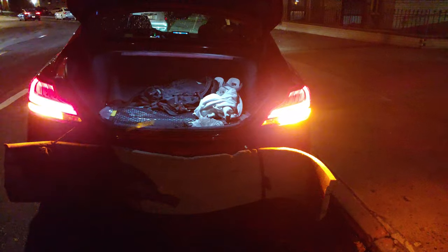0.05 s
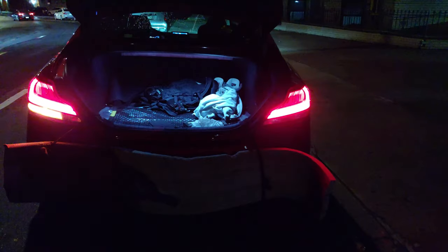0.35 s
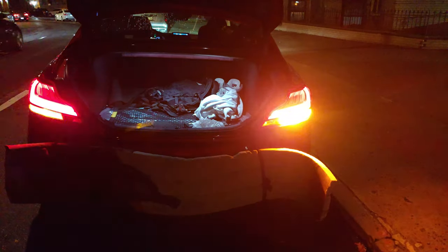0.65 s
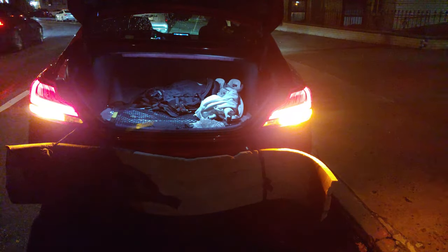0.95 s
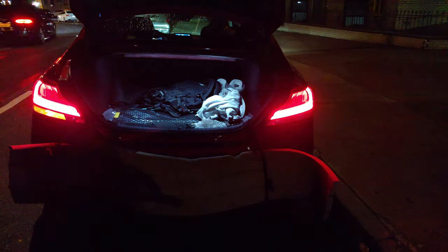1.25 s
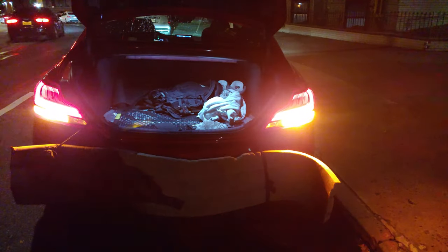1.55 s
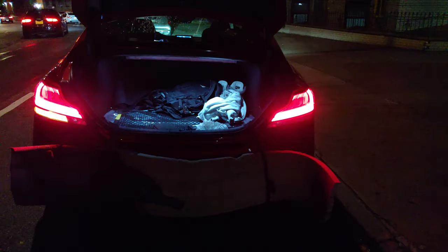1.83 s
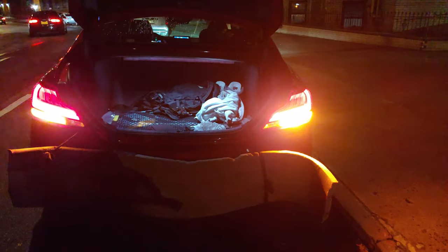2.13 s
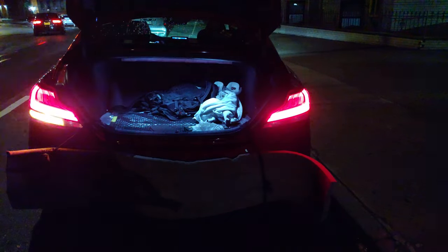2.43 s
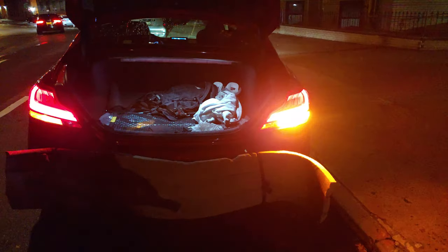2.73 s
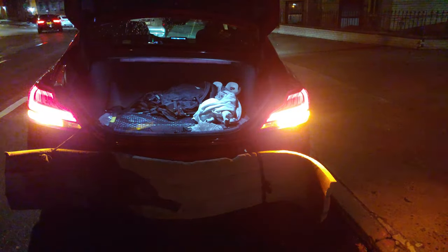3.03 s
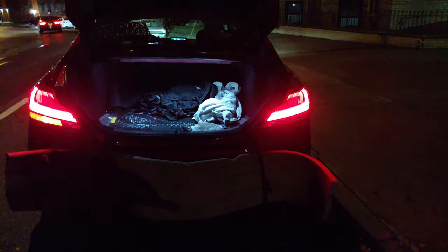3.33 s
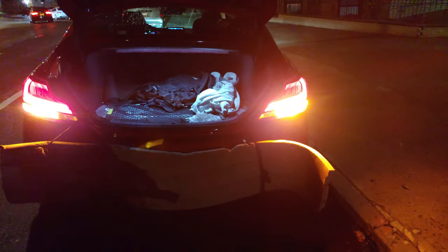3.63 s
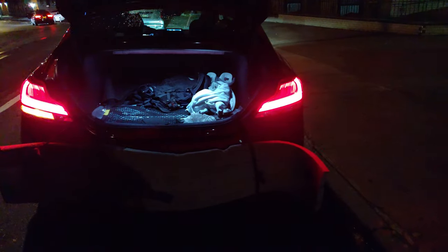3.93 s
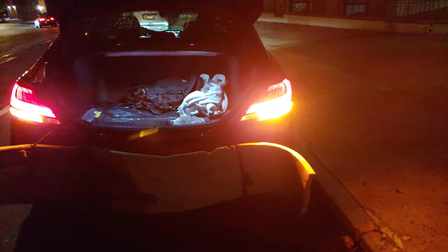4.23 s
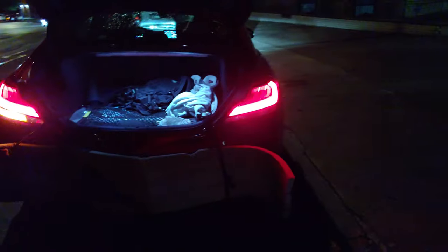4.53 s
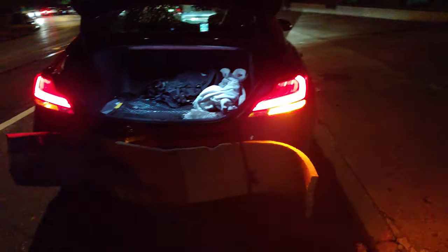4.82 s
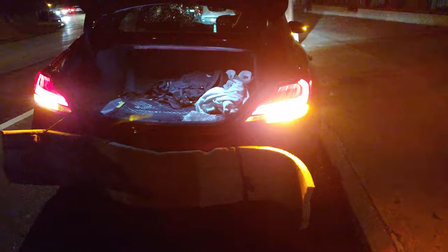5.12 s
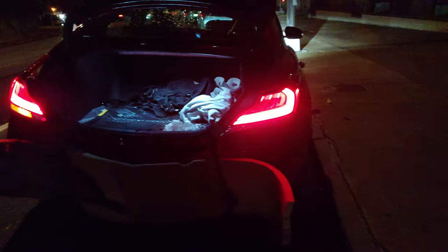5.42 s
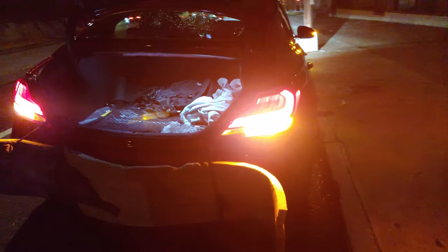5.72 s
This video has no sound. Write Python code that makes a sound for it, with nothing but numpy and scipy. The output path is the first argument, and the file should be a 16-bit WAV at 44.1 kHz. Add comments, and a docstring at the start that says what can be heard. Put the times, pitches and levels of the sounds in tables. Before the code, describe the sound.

A parked car idles a few steps away on a street at night. Its low exhaust hum swells over the first two seconds and then holds to the end, over a soft roar of distant tyres. From about 0.5 seconds another car revs up, shifts gear at around 1.3 seconds and recedes, growing faint by 4 seconds. At about 2.9 and 3.2 seconds wheels tip a loose road cover, giving two sharp clacks with a short echo; loose metal rattles briefly after the first. Crickets trill high throughout, growing a little louder in the second half. Close by there are tiny ticks at about 1.3, 3.4 and 5.3 seconds, a small scuff at 3.4 and very faint thin squeaks around 4 seconds. A faint fan tone and a barely audible electrical whine lie underneath.

```python
"""Night kerb, idling car.

A parked car idles a few steps away: exhaust hum, gas puffs. Another revs, shifts and pulls away over far
tyre noise. Two axles tip a loose road cover, which clacks; loose metal rattles after the first clack.
Crickets trill by wing strokes. Faint ticks, scuffs and squeaks close by; a faint fan and electrical whine."""
import sys
import numpy as np
from scipy import signal
from scipy.fft import rfft, irfft
from scipy.io import wavfile

SR = 44100
rng = np.random.default_rng(int(sys.argv[2]) if len(sys.argv) > 2 else 0)


def persist_wave(psi):
    """Save psi, clipped to +-1, as 16-bit WAV."""
    counts = np.round(np.clip(psi, -1, 1) * 32767).astype(np.int16)
    wavfile.write(sys.argv[1], SR, np.atleast_2d(counts).T)


N = 254456
T = np.arange(N) / SR
BIN_HZ = np.fft.rfftfreq(N, 1 / SR)

# street balance: f/Hz, left minus right/dB
STREET_BALANCE = [(100, 2), (400, 0), (1100, -2), (1600, -3), (2400, 1), (3400, -5), (4400, -1.5),
                  (5800, 4.5), (6600, 9), (7700, -4.5), (9600, 6.5), (12000, 6.5)]
# street left-right likeness: f/Hz, coherence
STREET_COHERENCE = [(60, 0.89), (350, 0.95), (550, 0.51), (850, 0.04), (1200, 0.13), (1550, 0.54),
                    (2200, 0.41), (4000, 0), (12000, 0.067)]
# idle exhaust hum: multiple of crank rate, relative level/dB
IDLE_HARMONICS = [(1, -9), (2, -2), (3, -14), (4, -16.5)]
# idle exhaust puffs: f/Hz, relative density/dB
PUFF_SPECTRUM = [(25, -34), (43, 9), (65, 5.5), (115, -3), (170, 4.5), (240, -2.5), (300, -3.5),
                 (390, -1.5), (470, -15.5), (800, -14.5), (2000, -60)]
# leaving car, upper harmonics: multiple of firing rate, relative level/dB
DRIVE_HARMONICS = [(4, -19.5), (5, -20.5), (8, -27), (9, -25.5)]
# its exhaust pipe resonances: f/Hz, width/Hz, lift/dB
PIPE_RESONANCES = [(316.5, 10.7, 13.5), (550, 49, 5)]
# its drone: t/s, harmonic 2 level/dB, harmonic 3 level/dB
DRONE_LEVELS = [(.3, -32, -36.5), (.55, -30, -30), (.82, -30, -34.5), (.92, -36, -44), (1.0, -32, -30),
                (1.12, -42, -27), (1.2, -33, -21.5), (1.33, -33, -29), (1.48, -28, -28.5),
                (1.65, -35.5, -31), (1.85, -43, -31.5), (2.03, -27, -37), (2.2, -30, -30),
                (2.36, -31.5, -32), (2.47, -38.5, -40.5), (3.1, -34.5, -38.5), (3.4, -43, -33.5),
                (3.8, -32, -38), (4.1, -50.5, -64)]
# far traffic roar: f/Hz, relative density/dB
ROAR_SPECTRUM = [(30, -9.5), (120, 6.5), (350, -5.5), (590, -5), (760, -4.5), (1100, -3.5), (1420, -4),
                 (1700, -9.5), (2000, -11.5), (2300, -20), (5600, -24.5), (6600, -25), (7800, -34.5),
                 (12000, -45.5)]
# tyre hiss: f/Hz, relative density/dB
HISS_SPECTRUM = [(1200, -15), (2000, 9.5), (2600, -8.5), (3100, 2.5), (3450, -3), (4100, 5), (4700, -3.5),
                 (5600, -12), (6650, -0.5), (7500, -11), (8500, -14), (12000, -24)]
# chorus crickets: f/Hz, relative level/dB, left minus right/dB
CRICKET_VOICES = [(4660, -8.5, -12.5), (4872, 1.5, -1), (4986, -4, -4), (4915, -12, -20.5),
                  (5145, -8, -8.5)]
# chorus swell and drift: t/s, level/dB, pitch offset/Hz
CHORUS_CURVES = [(.3, -48, 0), (.95, -42.5, -10), (1.3, -44, -50), (1.9, -40.5, 29.5), (2.5, -41, 20),
                 (3.02, -40.5, 10), (3.26, -43, -20), (3.62, -37.5, -10), (4.25, -38.3, 25),
                 (4.54, -41, 9.5), (4.9, -38.5, 0.5), (5.15, -38.8, -60), (5.76, -39.8, 36)]
# bouts of one higher cricket: t/s, length/s, level/dB
SOLO_BOUTS = [(.55, .25, -59), (1.6, 0.34, -57), (2.332, 0.42, -47.5), (2.7, .3, -55), (3.78, 0.59, -48.5),
              (4.696, 0.51, -49.5), (5.426, 0.34, -45.5)]
# near ticks: t/s, level/dB, decay/ms, left minus right/dB
TICK_EVENTS = [(1.2721, -47, 1.0, 5), (1.6717, -56, 1.0, 2), (3.4093, -45, 1.1, -2), (3.4307, -51, 3, 3.5),
               (5.3349, -46, 3.5, 3), (5.5644, -55, 2, 2.5)]
# cover modes: f/Hz, relative level/dB, t60/s
COVER_MODES = [(211.5, -22, 0.27), (276, -11.5, 0.057), (335, -12, 0.032), (417.5, -26, 0.22),
               (560, -21.5, 0.06), (752, -16, 0.03), (900, -18, 0.07), (1050, 0.5, 0.009),
               (1347, 8.5, 0.0089), (1475, -10.5, 0.031), (1640, -4.5, 0.009), (2010, -5.5, 0.015),
               (2720, -11.5, 0.013)]
# clack and rebounds per axle: t/s, level/dB, contact/ms, ring shift/semitones
COVER_BLOWS = [(2.917, -3, 0.24, 0.25), (2.932, -3.5, 0.42, -0.069), (2.943, -19, .2, 0.55),
               (3.2076, -4, 0.25, 0.33), (3.2232, -11, 0.2, 2), (3.233, -6, 0.53, -0.057),
               (3.248, -6, 0.71, 0.45), (3.256, -18, .2, -1.5)]
# loose metal hits: t/s, low resonance level/dB, high resonance level/dB
RATTLE_HITS = [(2.957, -39, -45), (2.963, -46, -47), (2.969, -37.5, -49), (2.976, -37.5, -46),
               (2.981, -54, -51), (2.99, -43, -48), (3.077, -45, -43)]
# near scuffs: t/s, level/dB, length/s, f/Hz, width/Hz
SCUFF_EVENTS = [(3.405, -45, .004, 4000, 3000), (3.42, -61, 0.03, 10700, 3000),
                (3.759, -66, 0.5, 10570, 2800)]
# squeaks: t/s, length/s, level/dB, start f/Hz, end f/Hz
SQUEAK_GLIDES = [(3.796, 0.081, -65, 9500, 9800), (3.84, .09, -69, 11300, 11350),
                 (3.89, .19, -73, 9500, 10900), (4.04, 0.11, -72, 11850, 11600),
                 (4.17, .06, -74, 11400, 11200)]

JOIN_S, JOIN_LENGTH_S = 0.544, 0.11  # more traffic comes within earshot


def undb(db):
    """Decibels to gain."""
    return 10 ** (np.asarray(db) / 20)


def unit(x):
    """Scale to rms 1."""
    return x / np.sqrt(np.mean(x ** 2))


def pan(db):
    """Stereo gains for a left minus right level."""
    return undb(np.array([[db], [-db]]) / 2)


def ramp(start_s, length_s):
    """Linear rise, 0 to 1."""
    return np.clip((T - start_s) / length_s, 0, 1)


def ease(start_s, length_s):
    """Smooth rise, 0 to 1."""
    return np.sin(np.pi / 2 * ramp(start_s, length_s)) ** 2


def passing(nearest_s, pass_s):
    """Drive-by gain, 1/distance: 1 when nearest, -3 dB at pass_s either side."""
    return 1 / np.hypot(1, (T - nearest_s) / pass_s)


def per_sample(table):
    """Value columns of a time table, per sample."""
    times_s, *columns = np.transpose(table)
    return [np.interp(T, times_s, column) for column in columns]


def per_bin(table):
    """Values of a frequency table, per FFT bin."""
    hz, value = np.transpose(table)
    return np.interp(np.log(BIN_HZ + 1), np.log(hz), value)


def noise(channels=2):
    """Independent white noises."""
    return rng.standard_normal((channels, N))


def walk(rate_hz):
    """Smooth random drift, rms 1."""
    knots_s = np.arange(0, T[-1] + 1, 1 / (3 * rate_hz))
    return unit(np.interp(T, knots_s, rng.standard_normal(len(knots_s))))


def colour(x, spectrum):
    """Filter by a spectrum table, rms 1."""
    return unit(irfft(rfft(x) * undb(per_bin(spectrum)), N))


def band(x, hz, width_hz):
    """Gaussian band-pass, rms 1."""
    return unit(irfft(rfft(x) * np.exp(-2 * ((BIN_HZ - hz) / width_hz) ** 2), N))


def from_road(x, lag_ms=0.25, above_hz=800):
    """Above the bass, road sound arrives on the left first."""
    lag_s = lag_ms / 1000 / (1 + (above_hz / (BIN_HZ + 1)) ** 8)
    right = irfft(rfft(x[1]) * np.exp(-2j * np.pi * BIN_HZ * lag_s), N)
    return np.array([x[0], right])


def street_noise():
    """Diffuse noise: coherent in the bass, independent in the treble."""
    mid, side = rfft(noise())
    coherence = np.clip(per_bin(STREET_COHERENCE), -.99, .99)
    sign = np.array([[1], [-1]])
    stereo = mid * np.sqrt(1 + coherence) + sign * side * np.sqrt(1 - coherence)
    balance = undb(sign * per_bin(STREET_BALANCE) / 2)
    return from_road(irfft(stereo * balance, N), lag_ms=0.32)


def exhaust(cycles, harmonics, rough_db, rough_hz):
    """Engine cycle harmonics, each wavering in level."""
    out = 0
    for order, db in harmonics:
        peak = np.sqrt(2) * undb(db + rough_db * walk(rough_hz))
        out = out + peak * np.cos(2 * np.pi * (order * cycles + rng.random()))
    return out


def idling_car(crank_hz=31.42, hum_db=-25, swell_db=7, swell_s=2, puff_db=-32):
    """Exhaust hum swells, then holds; a gas puff at each firing."""
    turns = np.cumsum(crank_hz * (1 + 0.0053 * walk(2.7))) / SR
    hum = exhaust(turns, IDLE_HARMONICS, rough_db=2.0, rough_hz=7.1)
    hum *= undb(hum_db - swell_db * (1 - ramp(0, swell_s)))
    # two firings a turn, one stronger
    firings = 1 + 0.73 * np.cos(2 * np.pi * 2 * turns) + 0.33 * np.cos(2 * np.pi * turns)
    puffs = colour(street_noise() * firings, PUFF_SPECTRUM)
    return hum * pan(1.55) + undb(puff_db) * puffs


def firing_hz(start_hz=60.17, rev_hz_per_s=10.9, shifted_hz=60.7, cruise_hz=71.08, cruise_lag_s=2.5):
    """Revs climb in low gear, drop in the shift, creep up towards cruise."""
    shift_s, shift_length_s = 1.16, .39
    low_gear_hz = start_hz + rev_hz_per_s * T
    since_s = np.maximum(T - shift_s - shift_length_s, 0)
    high_gear_hz = cruise_hz + (shifted_hz - cruise_hz) * np.exp(-since_s / cruise_lag_s)
    return low_gear_hz + (high_gear_hz - low_gear_hz) * ease(shift_s, shift_length_s)


def pipe_lift_db(hz):
    """Boost from the exhaust pipe's resonances."""
    return sum(db * np.exp(-((hz - centre_hz) / width_hz) ** 2)
               for centre_hz, width_hz, db in PIPE_RESONANCES)


def leaving_car(note_db=-27.5, open_db=2.5, coast_db=-24, soften_db=-1.5, rasp_db=-33, lag_s=0.28):
    """Engine pulls away and recedes; throbs and rasps under throttle, softens once up to speed."""
    hz = firing_hz()
    cycles = np.cumsum(hz * (1 + 0.01105 * walk(10.5))) / SR
    throttle = ease(0.46, lag_s) - ease(1.45, lag_s)
    throb = (1, coast_db + (open_db - coast_db) * throttle)
    upper = [(order, db + pipe_lift_db(order * hz)) for order, db in DRIVE_HARMONICS]
    note = exhaust(cycles, [throb] + upper, rough_db=2.5, rough_hz=11)
    note *= undb(note_db + soften_db * ease(2.6, lag_s)) * passing(nearest_s=0.97, pass_s=1.27)
    drone = exhaust(cycles, enumerate(per_sample(DRONE_LEVELS), 2), rough_db=2.0, rough_hz=22)
    puffs = noise(channels=1)[0] * (1 + np.cos(2 * np.pi * cycles))
    rasp = band(puffs, hz=170, width_hz=260) * undb(rasp_db) * throttle
    return (note + drone + rasp) * pan(2.0)


def traffic(rumble_db=-31.5, roar_db=-31.5, hiss_db=-41.5, whirr_db=-47.5, join_db=2.5, flicker_db=0.95):
    """Far tyres rumble and roar; the hiss of nearer ones dulls to a whirr as they leave."""
    rumble = band(street_noise(), hz=290, width_hz=190) * undb(rumble_db)
    step_db = join_db * (ease(JOIN_S, JOIN_LENGTH_S) - 1)
    roar = colour(street_noise(), ROAR_SPECTRUM) * undb(roar_db + step_db + flicker_db * walk(19))
    hiss = colour(street_noise(), HISS_SPECTRUM) * undb(hiss_db + flicker_db * walk(7.9))
    whirr = band(street_noise(), hz=2650, width_hz=700) * undb(whirr_db)
    return (rumble * passing(nearest_s=2.98, pass_s=1.83)
            + roar * passing(nearest_s=2.2, pass_s=7.0)
            + hiss * passing(nearest_s=0.054, pass_s=1.02)
            + whirr * passing(nearest_s=1.98, pass_s=0.57))


def fan(hz=263, db=-44, rough_db=1.0):
    """Faint blade tone of a cooling fan."""
    cycles = np.cumsum(hz * (1 + 0.0034 * walk(4))) / SR
    return np.sqrt(2) * np.sin(2 * np.pi * cycles) * undb(db - rough_db * walk(1.7))


def whine(hz=9998, wander_hz=3, db=-82):
    """Faint, thin electrical tone."""
    cycles = np.cumsum(hz + wander_hz * walk(8.5)) / SR
    return undb(db) * np.sqrt(2) * np.sin(2 * np.pi * cycles) * pan(10.0)


def trill(hz, smear_hz, stroke_hz=48, depth=0.19, octave_db=-39):
    """Wing strokes pulse one narrow, drifting resonance, smeared by distance."""
    strokes = np.cumsum(stroke_hz * rng.uniform(.8, 1.7) * (1 + 0.0526 * walk(3.7))) / SR
    cycles = np.cumsum(hz * (1 + .005 * walk(1.5))) / SR
    real, imag = irfft(rfft(noise()) / (1 + (2 * BIN_HZ / smear_hz) ** 2), N)
    wing = (real + 1j * imag) * np.exp(2j * np.pi * cycles)
    tone = unit(wing.real) + undb(octave_db) * unit((wing ** 2).real)
    return tone * (1 + depth * np.sin(2 * np.pi * strokes))


def stereo_trill(hz, smear_hz):
    """Independent trill per side: each gets its own mix of echoes."""
    return np.array([trill(hz, smear_hz) for _ in range(2)])


def crickets(solo_hz=5250, climb_hz=74.4):
    """Chorus swells and drifts; one higher voice climbs in each bout."""
    chorus_db, offset_hz = per_sample(CHORUS_CURVES)
    chorus = unit(sum(stereo_trill(hz + offset_hz, smear_hz=158) * undb(db) * pan(side_db)
                      for hz, db, side_db in CRICKET_VOICES))
    bouts = climb = 0
    for start_s, length_s, db in SOLO_BOUTS:
        progress = ramp(start_s, length_s)
        bouts = bouts + undb(db) * np.sqrt(np.abs(np.sin(np.pi * progress)))
        climb = climb + progress * (T < start_s + length_s)
    solo = stereo_trill(solo_hz + climb_hz * climb, smear_hz=135) * bouts * pan(-7.0)
    return chorus * undb(chorus_db) + solo


def singing_tyres(hz=1360, width_hz=280, fall_hz=280, db=-40.0, flicker_db=1.6):
    """Tread grooves ring in a narrow band; pitch sinks as the car passes."""
    sink_cycles = np.cumsum(fall_hz * ease(start_s=2.6, length_s=3.6)) / SR
    grooves = signal.hilbert(band(street_noise(), hz, width_hz))
    ring = (grooves * np.exp(-2j * np.pi * sink_cycles)).real
    gain = ease(JOIN_S, JOIN_LENGTH_S) * undb(db + flicker_db * walk(7))
    return ring * gain * passing(nearest_s=2.4, pass_s=2.3)


def decay(start_s, decay_s):
    """Instant onset, exponential fall."""
    return (T > start_s) * np.exp(-np.abs(T - start_s) / decay_s)


def ticks():
    """Tiny bright snaps, milliseconds long."""
    snap = band(noise(), hz=10500, width_hz=4500)
    return sum(snap * undb(db) * pan(side_db) * decay(start_s, decay_ms / 1000)
               for start_s, db, decay_ms, side_db in TICK_EVENTS)


def blow(at_s, db, contact_ms):
    """Gaussian force pulse; longer contact is duller."""
    contact_s = contact_ms / 1000
    return undb(db) * np.exp(-2 * ((T - at_s) / contact_s) ** 2) / (contact_s * SR)


def road_cover(rise_cycles=1.28, echo_db=-8.5, echo_t60_s=0.62, echo_delay_s=.022):
    """Each axle tips the cover; it rebounds, its ring shifting with load. House fronts scatter it."""
    t = T[:SR // 2]
    direct = 0
    for at_s, db, contact_ms, semitones in COVER_BLOWS:
        ring = 0
        for hz, mode_db, t60_s in COVER_MODES:
            rise = 1 - np.exp(-(t * hz / rise_cycles) ** 2)  # heavy plate, slow to start
            mode = np.sin(2 * np.pi * hz * 2 ** (semitones / 12) * t)
            ring = ring + mode * rise * undb(mode_db - 60 * t / t60_s)
        direct = direct + signal.fftconvolve(blow(at_s, db, contact_ms), ring / np.abs(ring).max())[:N]
    scatter = noise()[:, :len(t)] * undb(-60 * t / echo_t60_s) * (t > echo_delay_s)
    scatter /= np.sqrt(np.sum(scatter[0] ** 2))
    echo = signal.fftconvolve(direct[None], scatter, axes=1)[:, :N]
    return from_road(direct * pan(-4.0) + undb(echo_db) * echo)


def rattle(crack_db=-8.5, decay_s=0.0083):
    """Loose metal chatters after the jolt: two resonances and a bright crack per hit."""
    low = band(noise(), hz=3200, width_hz=1900) * pan(-2.8)
    high = band(noise(), hz=6250, width_hz=800)
    crack = band(noise(), hz=8500, width_hz=6000) * undb(crack_db)
    bright = (high + crack) * pan(6.5)
    return sum((undb(low_db) * low + undb(high_db) * bright) * decay(start_s, decay_s)
               for start_s, low_db, high_db in RATTLE_HITS)


def scuffs(grit_db=3):
    """Short gritty rubs."""
    grit = undb(grit_db * walk(300))
    out = 0
    for start_s, db, length_s, hz, width_hz in SCUFF_EVENTS:
        age = np.maximum(T - start_s, 0) * 2 / length_s
        swell = age * np.exp((1 - age ** 2) / 2)
        out = out + band(noise(), hz, width_hz) * undb(db) * swell
    return out * grit


def squeaks(arch_hz=150, waver_hz=190):
    """Thin, scratchy tones; pitch glides and arches."""
    out = 0
    for start_s, length_s, db, start_hz, end_hz in SQUEAK_GLIDES:
        progress = ramp(start_s, length_s)
        arch = np.abs(np.sin(np.pi * progress))
        hz = start_hz + (end_hz - start_hz) * progress + arch_hz * arch + waver_hz * walk(250)
        out = out + undb(db) * np.sqrt(2 * arch) * np.sin(2 * np.pi * np.cumsum(hz) / SR)
    return out * pan(3.5)


def scene():
    """Stereo sum of all sources."""
    sustained = idling_car() + leaving_car() + traffic() + fan() + whine() + crickets() + singing_tyres()
    return sustained + ticks() + road_cover() + rattle() + scuffs() + squeaks()


def record(dry, low_cut_hz=27, bass_hz=210, top_hz=12100, quiet_db=-66, floor_db=-24, fade_start_s=0.08):
    """Fade-in, bass last; deepest rumble and top cut."""
    full = signal.sosfilt(signal.butter(4, low_cut_hz, "high", fs=SR, output="sos"), dry)
    thin = signal.sosfilt(signal.butter(2, bass_hz, "high", fs=SR, output="sos"), full)
    bass = (full - thin) * ramp(start_s=0.223, length_s=0.018)
    fade = undb(floor_db) + (1 - undb(floor_db)) * ramp(fade_start_s, length_s=0.29)
    faded = (thin + bass) * np.where(T < fade_start_s, undb(quiet_db), fade)
    return signal.sosfilt(signal.ellip(10, .2, 70, top_hz, fs=SR, output="sos"), faded)


dry = scene()
out = record(dry)
persist_wave(out)
```